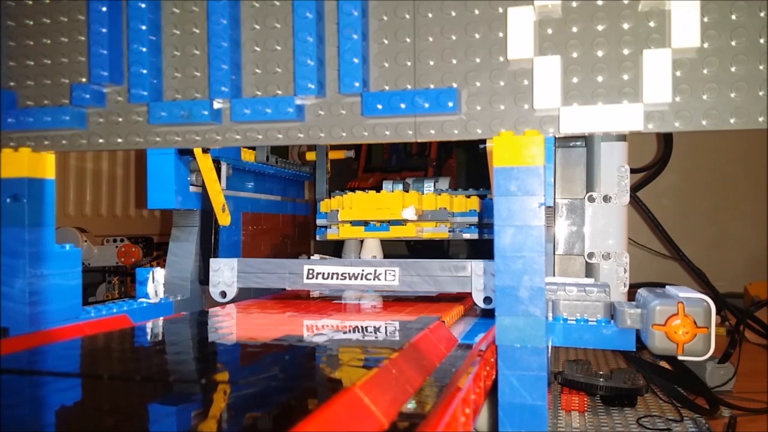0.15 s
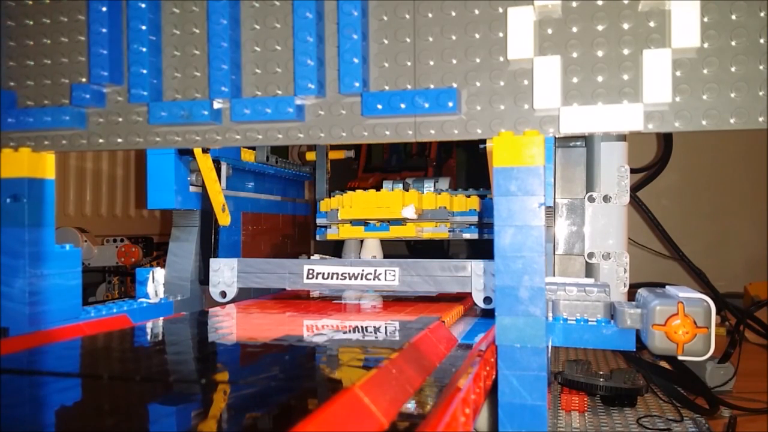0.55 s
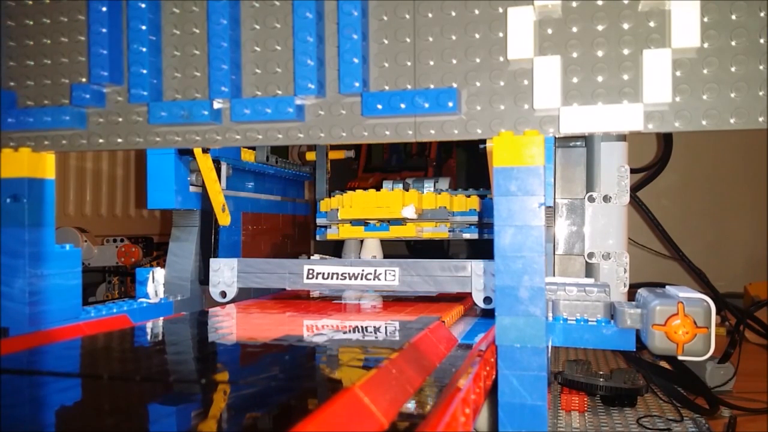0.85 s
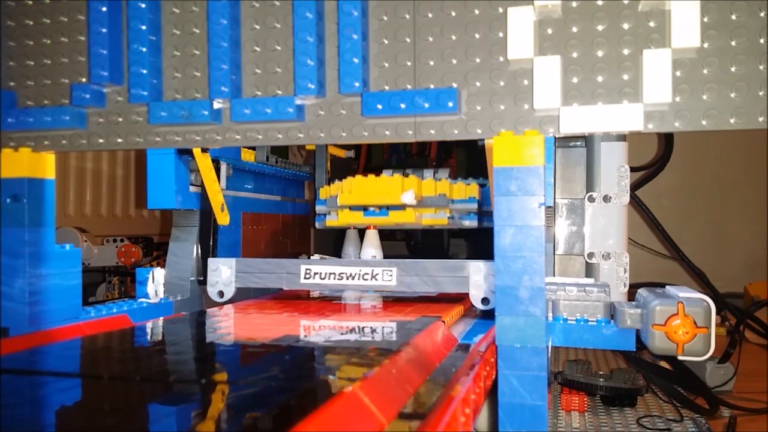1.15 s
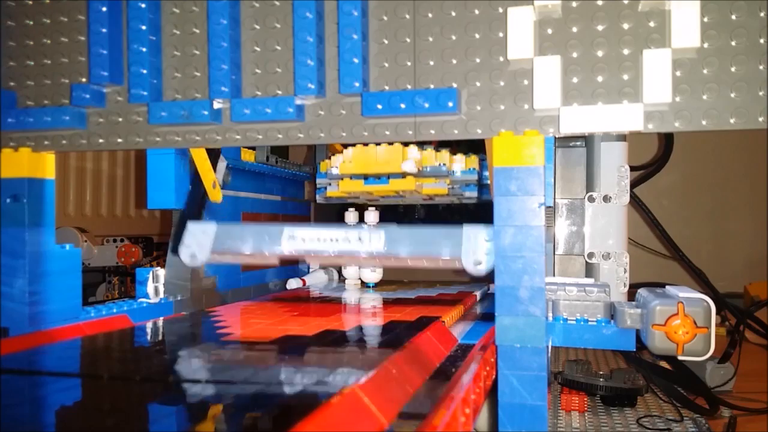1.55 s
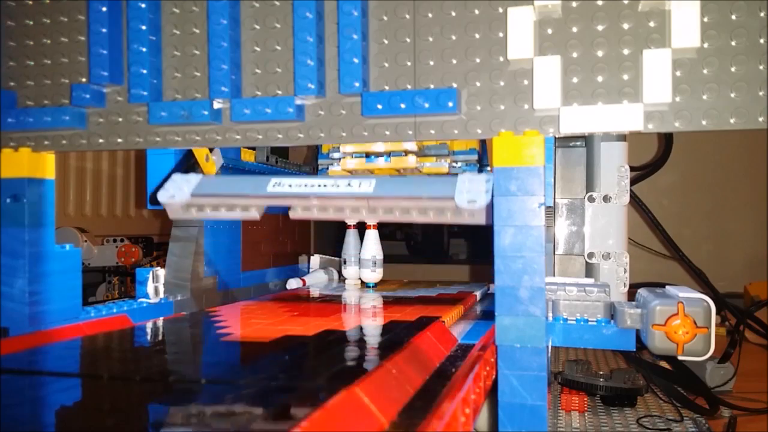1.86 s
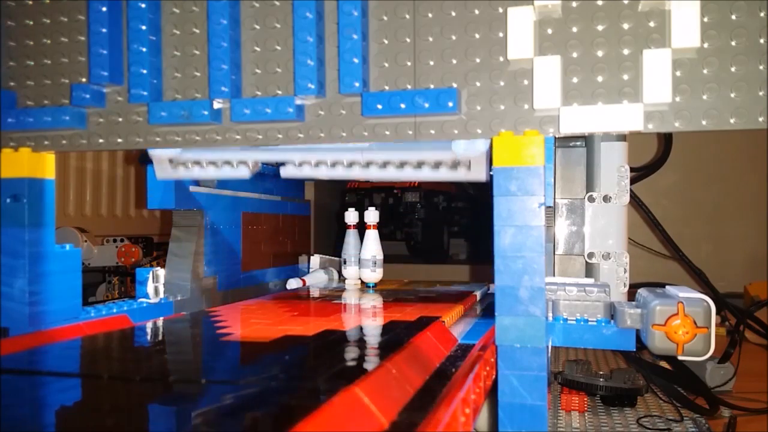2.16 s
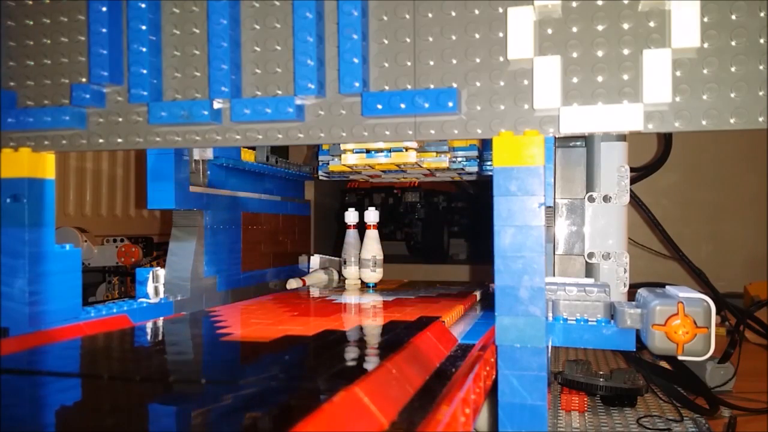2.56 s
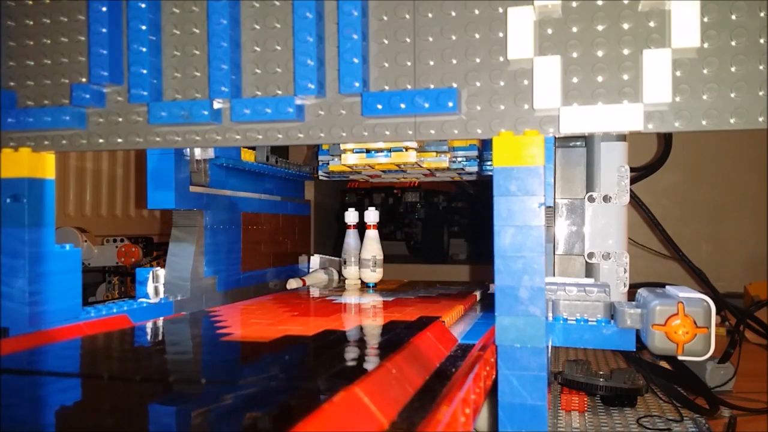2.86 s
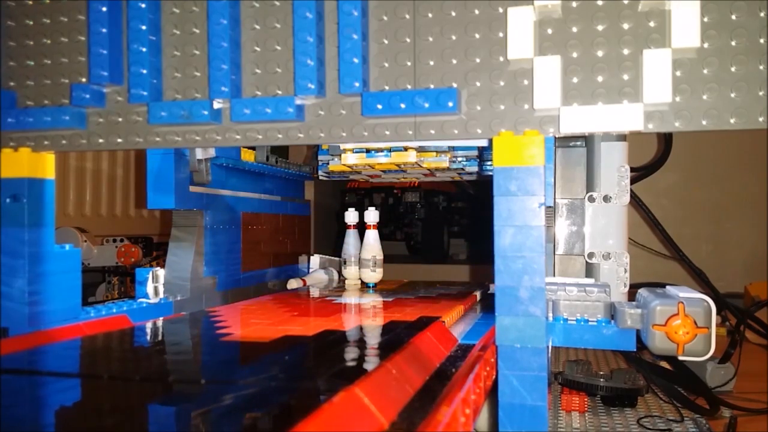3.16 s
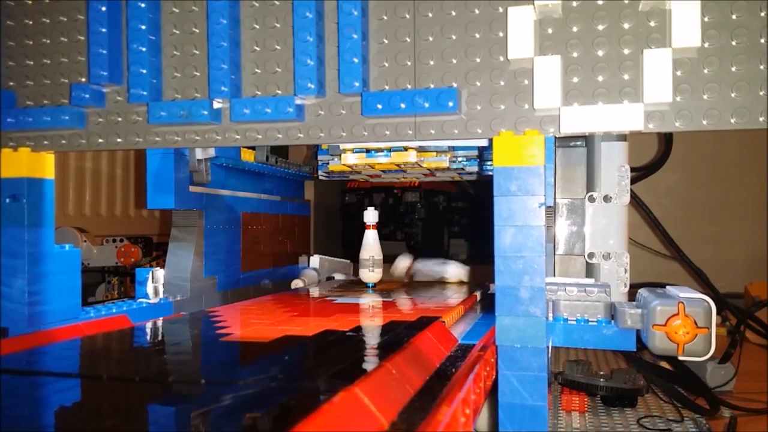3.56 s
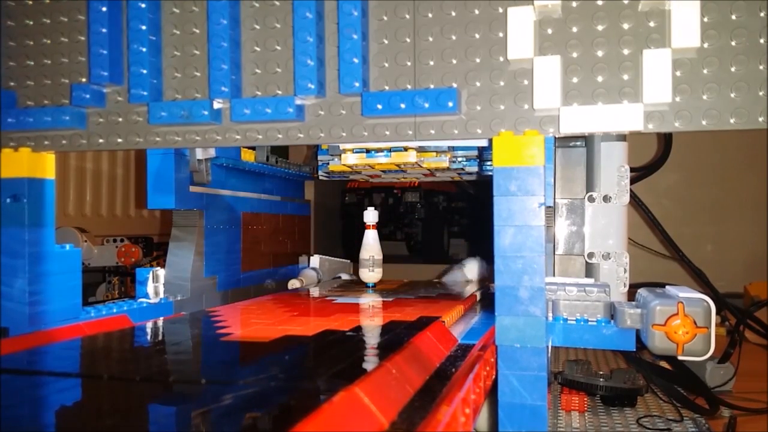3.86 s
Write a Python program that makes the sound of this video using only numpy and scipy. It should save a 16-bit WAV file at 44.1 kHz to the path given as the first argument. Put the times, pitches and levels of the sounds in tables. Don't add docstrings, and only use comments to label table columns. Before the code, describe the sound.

A toy-brick bowling machine clunks and rumbles, a small geared motor whines faintly as its bar lifts, then after a quiet pause a ball rattles loudly down the lane into plastic pins, close stereo, small room.

```python
import sys
import numpy as np
from scipy import signal
from scipy.fft import rfft, irfft
from scipy.io import wavfile
from scipy.ndimage import uniform_filter1d

SR = 44100
rng = np.random.default_rng(int(sys.argv[2]) if len(sys.argv) > 2 else 0)


def unload_wav(signal):
    wavfile.write(
        sys.argv[1],
        SR,
        np.round(np.clip(np.atleast_2d(signal).T, -1, 1) * 32767).astype(np.int16),
    )


def voltage_ratio(level):
    return 10 ** (np.asarray(level, float) / 20)


N = 176400
T = np.arange(N) / SR

# start_s, peak_db, bright_db, ring_hz, upper_modes_db
LATCH_KNOCKS = [(0.403, -18, -13, 427, 3), (0.416, -14.5, -25, 450, 4), (0.442, -18, -34, 315, 3.5),
                (.482, -21, -35, 315, 2), (.505, -20, -43, 509, -1), (.668, -21.5, -46, 527, -4),
                (.951, -24.5, -39, 560, -14), (1.003, -26.5, -48, 610, -6), (1.183, -14, -49, 498, -17),
                (1.196, -16, -45, 493, -14), (1.302, -18, -31, 515, 0.5)]
BALL_KNOCKS = [(2.926, -10.5, -14.5, 582, 4), (2.939, -13, -23, 450, 4.5), (2.978, -11.5, -28, 970, -1),
               (2.995, -8.5, -13.5, 620, -7.5), (3.002, -8, -31, 636, 1), (3.045, -6, -44, 452, -1),
               (3.137, -10, -16.5, 660, -1.5), (3.143, -8.5, -43, 444.4, -4), (3.176, -3.5, -33, 880, 1.5),
               (3.208, -6, -38, 1010, 0), (3.23, -5, -49, 635, 3), (3.254, -6, -30, 693, 0.5),
               (3.278, -6, -31, 459, 0), (3.307, -7, -15, 1120, 4), (3.326, -7.5, -24, 640, 0),
               (3.336, -8.5, -8, 497, -8), (3.363, -8, -5.5, 473, -15), (3.387, -5, -14.5, 514, 2),
               (3.412, -4.5, -24, 506, -3), (3.436, -17, -7, 450, 7.5), (3.449, -7.5, -28, 410, -7),
               (3.475, -4, -20, 410, -9.5)]
PIN_KNOCKS = [(3.515, -5, -24, 480, 6.5), (3.541, -13, -4, 388, -9), (3.594, -5.5, -10.5, 430, 0),
              (3.632, -16, -1, 420, 2), (3.677, -5.5, -6, 383, -9.5), (3.703, -13.5, -20, 355, -8),
              (3.721, -14, -4.5, 373, -17), (3.771, -20, 3.5, 396, 11.5), (3.798, -4, -14, 470, -7),
              (3.886, -18, -1.5, 450, 0), (3.944, -7, -10, 527, -3.5), (3.959, -13.5, -5, 600, -4),
              (3.969, -13, -13, 600, 0)]
# mode_hz, level_db, t60_s
FRAME_MODES = [(487, 3.5, 0.038), (316, -6, 0.05), (853, 0, 0.047), (1400, 0.5, 0.064), (2950, -10, 0.044)]
LANE_MODES = [(450, -2, 0.041), (642, -2.5, 0.02), (890, 0.5, 0.023), (1800, -5, 0.018), (2787, -7, 0.022)]
# time_s, left_right_db
KNOCK_PATH = [
    (1.1, 1),
    (1.3, -0.5),
    (2.9, 3.5),
    (3.2, 7.5),
    (3.4, 2),
    (4, -2.5),
]
# start_s, peak_db, centre_hz
PIN_CLICKS = [(2.545, -53, 9000), (2.625, -51, 2500), (3.512, -22, 11000), (3.539, -16, 9700),
              (3.589, -13.5, 13300), (3.596, -7.5, 8700), (3.665, -15, 12700), (3.7708, -18.5, 10600),
              (3.9244, -17.5, 8140)]
# start_s, length_s, level_db
PIN_SKIDS = [
    (3.8, .11, -24),
    (3.944, 0.11, -20.5),
]
# time_s, level_db, fizz_db, hollow_hz
RACK_ROLL = [(.402, -30, -16.5, 404), (.55, -33, -35.5, 298), (.69, -30.5, -28.5, 547),
             (.77, -33, -32, 434), (.88, -27.5, -28, 537), (.94, -33, -35, 566), (1.09, -30, -28, 686),
             (1.24, -34.5, -20, 502), (1.34, -39.5, -35.5, 470)]
BALL_ROLL = [(2.926, -26, -7, 487), (3.03, -25.5, -16.5, 560), (3.17, -31, -21.5, 484),
             (3.3, -29.5, -42, 535), (3.36, -29.5, -26, 470), (3.5, -26.5, -9.5, 420),
             (3.6, -27, -4.5, 417), (3.7, -25, -4.5, 375), (3.76, -32, -1.5, 393), (3.795, -34.5, -13, 423),
             (3.805, -17.5, -11, 438), (3.87, -24.5, -8, 450), (3.938, -45.5, 11, 483),
             (3.948, -21, -11.5, 526), (4, -20.5, -6.5, 620)]
# freq_hz, level_db
RACK_BOX = [(60, -12.5), (190, -14), (290, -3), (570, -4), (900, -2.5), (1200, -13), (1700, -15.5),
            (3200, -46)]
LANE_BOX = [(60, -50), (220, -15), (420, 0.5), (950, -4.5), (1500, -8), (2600, -20.5), (3300, -27),
            (8000, -65)]
FIZZ_SPECTRUM = [(1500, -5), (3000, 3), (6000, -2), (9000, -4.5), (12000, -15.5), (15000, -12)]
# time_s, tooth_rate_hz, level_db
MOTOR_RUN = [
    (1.05, 497.5, -61),
    (1.15, 508.5, -39.5),
    (1.18, 543, -37.5),
    (1.25, 552, -37),
    (1.36, 532.6, -37),
    (1.55, 568.6, -37),
    (1.74, 588, -36),
    (1.97, 561.6, -36),
    (2.03, 543, -40.5),
    (2.2, 494, -63.5),
]
# multiple, level_db
TOOTH_ORDERS = [(1, 0), (2, -1.5), (3, 5.5), (4, 1.5)]
# freq_hz, level_db
HISS_SPECTRUM = [(90, -12.5), (400, -18.5), (900, -13), (1350, -9.5), (2000, -6.5), (3200, -10.5),
                 (9500, -31.5), (14000, -49)]
# centre_hz, width_hz, level_db
CASE_MODES = [(6530, 680, -10), (9230, 3700, -2), (11400, 560, -11)]
# centre_hz, width_hz
CASE_GAPS = [(890, 260), (1990, 240)]
# freq_hz, left_right_db
MOTOR_BALANCE = [(2000, -3), (4500, 0.5), (9000, -8.5)]
# start_s, length_s, pitch_hz, level_db
BAR_GROAN = (1.95, .13, 1580, -41.5)
# start_s, length_s, pitch_hz, level_db
FAR_CREAKS = [
    (2.431, 0.13, 393, -61.5),
    (2.595, 0.096, 386, -52.5),
]
# start_s, length_s, pitch_hz, level_db
TABLE_THRUMS = [
    (2.93, 0.14, 106, -45.5),
    (3.12, 0.22, 104, -38.5),
    (3, 0.18, 83.33, -45),
]
# freq_hz, t60_s
ROOM_DECAY = [(300, 0.36), (3000, 0.67), (14000, 0.36)]
# freq_hz, level_db
AIR_SPECTRUM = [(25, -23), (92, -1.5), (300, -18), (700, -25.5), (1100, -20.5), (3000, -26.5),
                (9000, -26.5), (14500, -31.5)]
# freq_hz, likeness
AIR_LIKENESS = [(60, 0.98), (950, 0.26), (15000, -0.25)]

LAG_SAMPLES_PER_DB = 2
SHIFT_S = 0.461
TICK_T60_S = 0.028
CLICK_WIDTH_HZ, CLICK_T60_S = 4200, 0.032
GEAR_TOP_HZ, EDGE_HZ = 13300, 14570
AIR_DB, HUM_HZ, HUM_DB = -58.5, 8300, -82
STIR_DB = 8


def evened(x):
    return x / np.sqrt(np.mean(x ** 2) + 1e-20)


def read(points, hz):
    f, value = np.transpose(points)
    return np.interp(np.log(hz + 1), np.log(f + 1), value)


def colour(x, table):
    n = x.shape[-1]
    gain = voltage_ratio(read(table, np.fft.rfftfreq(n, 1 / SR)))
    return irfft(rfft(x) * gain, n)


def curve(rows, col):
    rows = np.array(rows)
    return np.interp(T, rows[:, 0], rows[:, col])


def resonate(x, hz, width_hz):
    turn = np.exp(2j * np.pi * np.cumsum(hz * np.ones(x.shape[-1])) / SR)
    r = np.exp(-np.pi * width_hz / SR)
    return 2 * (turn * signal.lfilter([1 - r], [1, -r], x / turn)).real


def resonate_twice(x, hz, width_hz):
    return resonate(resonate(x, hz, width_hz), hz, width_hz)


def butter(x, order, hz, kind):
    return signal.sosfilt(signal.butter(order, hz, kind, fs=SR, output="sos"), x)


def add(mix, start_s, sound, pan_db):
    lag = int(np.clip(LAG_SAMPLES_PER_DB * pan_db, -12, 12))
    for c, side in enumerate((1, -1)):
        first = round(start_s * SR) + max(-side * lag, 0)
        part = mix[c, first:][:sound.shape[1]]
        part += sound[c, :len(part)] * voltage_ratio(side * pan_db / 2)


def hits(rows, modes, gain_db, crack_db, tick_db, detune):
    out, t = np.zeros((2, N)), T[:4000]
    mode_hz, mode_db, t60_s = np.transpose(modes)[:, :, None]
    count = len(mode_hz)
    for start_s, peak_db, bright_db, ring_hz, upper_db in rows:
        hz = mode_hz * (1 + detune * rng.standard_normal((count, 1)))
        hz[0] = ring_hz
        level = voltage_ratio(mode_db + 2.5 * rng.standard_normal((2, count, 1)) - 60 * t / t60_s)
        level[:, 1:] *= voltage_ratio(upper_db)
        tone = (level * np.sin(2 * np.pi * hz * t)).sum(1)
        noise = rng.standard_normal((3, len(t)))
        crack = evened(resonate(noise[0] + 0.91 * noise[1:], 1020, 1100))
        crack = crack * voltage_ratio(crack_db + upper_db - 60 * t / 0.035)
        tick = evened(colour(noise[1:], FIZZ_SPECTRUM))
        tick = tick * voltage_ratio(tick_db + bright_db - 60 * t / TICK_T60_S)
        sound = (tone / abs(tone).max() + crack + tick) * np.minimum(t / 0.00051, 1)
        pan_db = np.interp(start_s, *np.transpose(KNOCK_PATH))
        add(out, start_s, voltage_ratio(peak_db + gain_db) * sound, pan_db)
    return butter(out, 2, 220, "high")


def pin_clicks():
    out, t = np.zeros((2, N)), T[:8000]
    for start_s, peak_db, hz in PIN_CLICKS:
        burst = evened(resonate_twice(rng.standard_normal((2, len(t))), hz, CLICK_WIDTH_HZ))
        fast = voltage_ratio(peak_db - 6 - 60 * t / CLICK_T60_S)
        slow = voltage_ratio(peak_db - 21.5 - 60 * t / 0.9)
        add(out, start_s, (fast + slow) * burst * np.minimum(t / 0.0007, 1), -1)
    return out


def pin_skids():
    out = np.zeros((2, N))
    for start_s, length_s, level_db in PIN_SKIDS:
        chatter = rng.standard_normal((3, round(length_s * SR))) ** 3
        scrape = evened(resonate(resonate(chatter[0] + chatter[1:], 1860, 1350), 1940, 1540))
        slowing = np.sqrt(np.linspace(1, 0, chatter.shape[1]))
        add(out, start_s, voltage_ratio(level_db) * scrape * slowing, -2)
    return out


def box_ring(table, t60_s, same):
    a, b = rng.standard_normal((2, 8192))
    same = np.clip(same, 0, 1)
    ring = np.array([a, same * a + np.sqrt(1 - same ** 2) * b]) * voltage_ratio(-60 * T[:8192] / t60_s)
    return colour(np.pad(ring, ((0, 0), (1024, 0))), table)


def rolling(rows, table, per_s, spread_db, t60_s, same, fizz_db, fizz_t60_s, hollow_db, width_hz):
    start_s, end_s = rows[0][0], rows[-1][0]
    low, high = np.zeros((2, 2, N))
    for k in range(3):
        ticks = voltage_ratio(spread_db * np.minimum(rng.exponential(1, N), 4))
        ticks = ticks * (rng.random(N) < per_s / SR)
        ticks = ticks * np.cos(np.pi * (T / SHIFT_S + k) / 3) ** 2
        ring = box_ring(table, t60_s, same)
        low += signal.fftconvolve(ticks[None], ring, axes=1)[:, 1024:N + 1024]
        fizz = box_ring(FIZZ_SPECTRUM, fizz_t60_s, 0.072)
        high += signal.fftconvolve(ticks[None], fizz, axes=1)[:, 1024:N + 1024]
    low = evened(low)
    low = low + voltage_ratio(hollow_db) * evened(resonate(low, curve(rows, 3), width_hz))
    both = evened(low) + evened(high) * voltage_ratio(curve(rows, 2) + fizz_db)
    gate = np.clip(np.minimum((T - start_s) / 0.00057, (end_s + 0.02 - T) / 0.028), 0, 1)
    return gate * voltage_ratio(curve(rows, 1)) * both


def motor():
    tooth_hz = curve(MOTOR_RUN, 1)
    waver = evened(uniform_filter1d(rng.standard_normal(N), size=300))
    turns = np.cumsum(tooth_hz * (1 + 0.0055 * waver)) / SR
    count = len(TOOTH_ORDERS)
    wobble = uniform_filter1d(rng.standard_normal((count, 2, N)), size=600) * 26
    phase = rng.random((count, 1, 1)) + 0.26 * rng.random((count, 2, 1))
    sing = np.zeros((2, N))
    for (k, level_db), w, p in zip(TOOTH_ORDERS, wobble, phase):
        sing += voltage_ratio(level_db + 3.53 * w) * np.cos(2 * np.pi * (k * turns + p))
    sing *= np.clip((1.995 - T) / 0.016, 0.15, 1)

    noise = rng.standard_normal((2, N)) * (0.63 + np.exp(-(turns % 1) / 0.66))
    hiss = evened(colour(noise, HISS_SPECTRUM))
    fuzz = evened(sum(resonate(noise, k * tooth_hz, 15 * k) / np.sqrt(k) for k in range(3, 12)))
    fuzz = butter(fuzz, 4, 1300, "high")
    case = evened(sum(voltage_ratio(db) * resonate_twice(noise, hz, width_hz) for hz, width_hz, db in CASE_MODES))
    rush = voltage_ratio(-2.5) * fuzz + voltage_ratio(-1.5) * hiss + voltage_ratio(0.5) * case
    for hz, width_hz in CASE_GAPS + CASE_GAPS:
        rush = rush - resonate(rush, hz, width_hz) * (T < 1.97)
    out = voltage_ratio(-5.0) * evened(sing) + butter(rush, 4, GEAR_TOP_HZ, "low")

    start_s, end_s = MOTOR_RUN[0][0], MOTOR_RUN[-1][0]
    running = np.clip(np.minimum(T - start_s + 0.057, end_s + 0.055 - T) / 0.14, 0, 1)
    side = np.array(MOTOR_BALANCE) * [1, 0.5]
    out = np.array([colour(out[0], side), colour(out[1], side * [1, -1])])
    return out * voltage_ratio(curve(MOTOR_RUN, 2)) * running


def creaks():
    out = np.zeros((2, N))
    for start_s, length_s, hz, level_db in FAR_CREAKS + [BAR_GROAN] + TABLE_THRUMS:
        t = T[:round(length_s * SR)]
        noise = rng.standard_normal((3, len(t)))
        rub = evened(resonate_twice(noise[0] + 0.45 * noise[1:], hz, 50 + hz / 10))
        swell = np.sin(np.pi * t / length_s)
        add(out, start_s, voltage_ratio(level_db) * rub * swell, 14.0 if hz < 200 else -2.5)
    return out


def room(x):
    taps = np.zeros((2, SR // 2))
    at = np.arange(200, SR // 2 - 20, 20)
    at = at + rng.integers(0, 20, (2, len(at)))
    np.put_along_axis(taps, at, rng.choice([-1., 1.], at.shape), 1)
    hz, t, z = signal.stft(taps, SR, nperseg=256)
    decay = voltage_ratio(-60 * t / read(ROOM_DECAY, hz)[:, None])
    tail = signal.istft(z * decay, SR, nperseg=256)[1]
    return signal.fftconvolve(x, tail / np.linalg.norm(tail[0]), axes=1)[:, :N]


def air():
    frames, hz = N // 256 + 5, np.fft.rfftfreq(1024, 1 / SR)
    a, b, c, d, patches = rng.standard_normal((frames, 513, 5)).T
    patches = uniform_filter1d(patches, size=12, axis=0)
    patches = evened(uniform_filter1d(patches, size=14, axis=1))
    same = np.clip(read(AIR_LIKENESS, hz), -1, 1)[:, None]
    left = a + 1j * b
    z = np.array([left, same * left + np.sqrt(1 - same ** 2) * (c + 1j * d)])
    stir = np.exp(-np.log(hz / 650 + 0.00077) ** 2)[:, None] * (np.arange(frames) * 256 / SR > 2)
    z *= voltage_ratio(read(AIR_SPECTRUM, hz)[:, None] + patches + STIR_DB * stir)
    tone = signal.istft(z, nperseg=1024, noverlap=768)[1][:, :N]
    hum = evened(resonate(rng.standard_normal(N), HUM_HZ, 20))
    return voltage_ratio(AIR_DB) * evened(tone) + voltage_ratio(HUM_DB) * hum


def scene():
    knocks = hits(LATCH_KNOCKS, FRAME_MODES, gain_db=0.5, crack_db=-11, tick_db=4.5, detune=0.079)
    knocks += hits(BALL_KNOCKS + PIN_KNOCKS, LANE_MODES, gain_db=0.53, crack_db=-14.5, tick_db=2.5,
                   detune=0.106)
    knocks += pin_clicks()
    rack = rolling(RACK_ROLL, RACK_BOX, per_s=500, spread_db=2.5, t60_s=0.3, same=0.72,
                   fizz_db=9.5, fizz_t60_s=0.016, hollow_db=-2.3, width_hz=134)
    ball = rolling(BALL_ROLL, LANE_BOX, per_s=900, spread_db=2.5, t60_s=0.12, same=0.42,
                   fizz_db=2.5, fizz_t60_s=0.017, hollow_db=-9.5, width_hz=360)
    steady = butter(rack + ball + creaks() + pin_skids(), 2, 60, "high")
    reverb = voltage_ratio(-9.5) * room(knocks) + voltage_ratio(-5.5) * room(steady)
    return knocks + steady + reverb + motor() + air()


def roll_off(x):
    return signal.sosfilt(signal.butter(12, 15810, fs=SR, output="sos"), x)


def record(dry):
    soft = np.tanh(dry * 1.107) / 1.086
    lowpass = signal.firwin(95, EDGE_HZ, window=("kaiser", 5), fs=SR)
    mix = signal.oaconvolve(soft, lowpass[None], "same")
    return roll_off(mix)


dry = scene()
out = record(dry)
unload_wav(out)
```